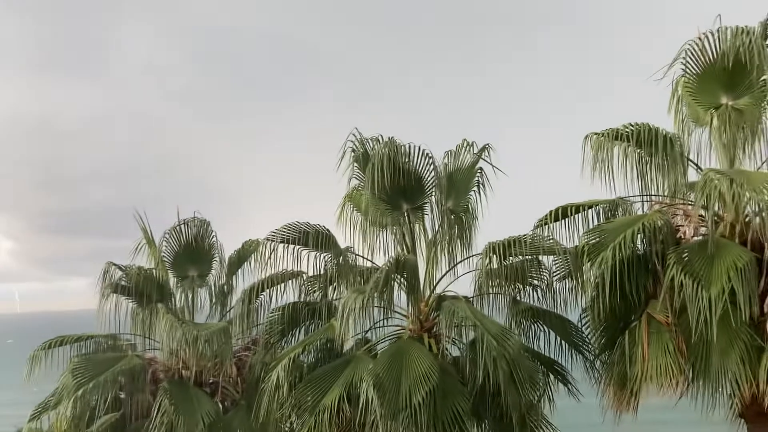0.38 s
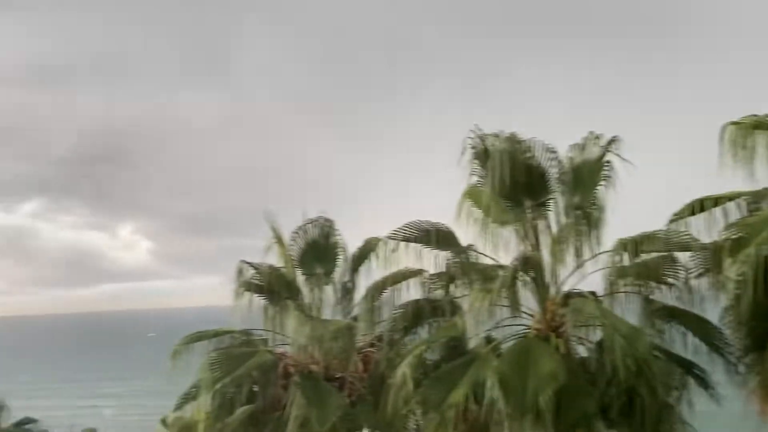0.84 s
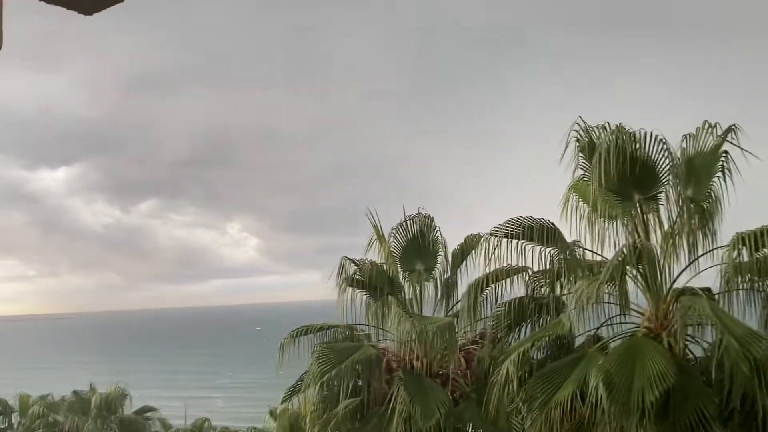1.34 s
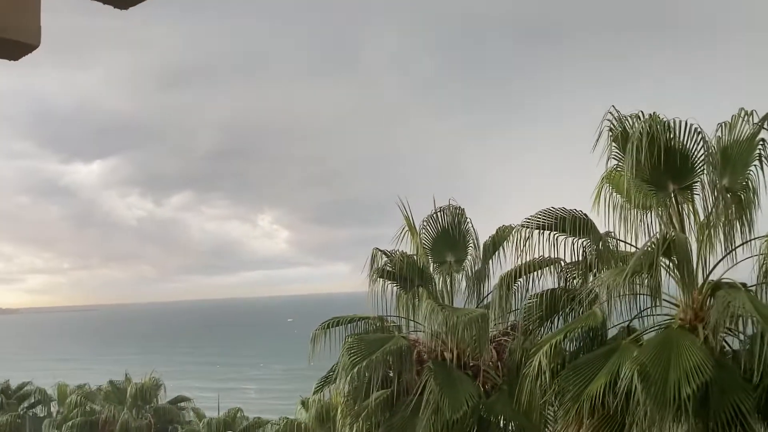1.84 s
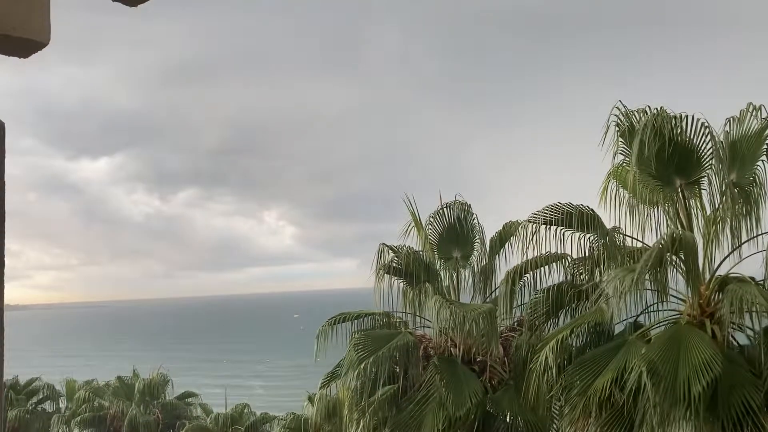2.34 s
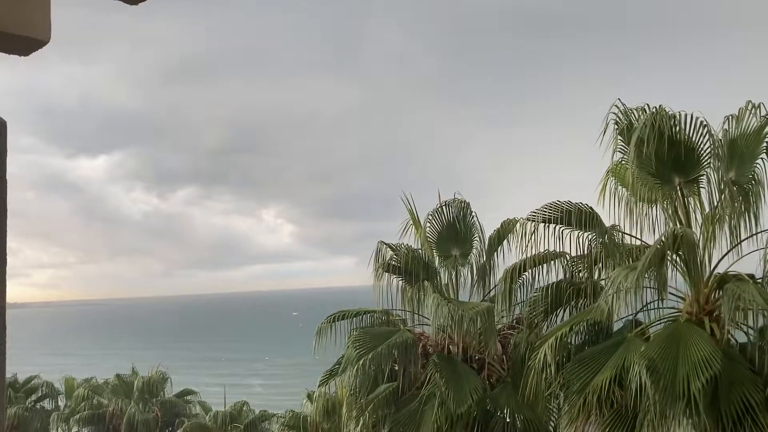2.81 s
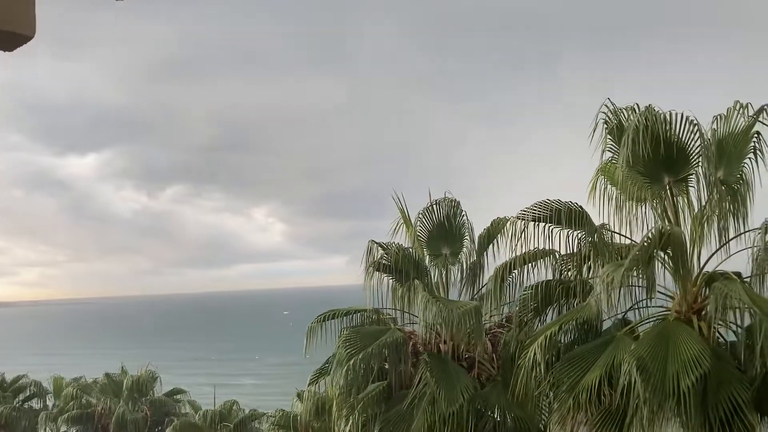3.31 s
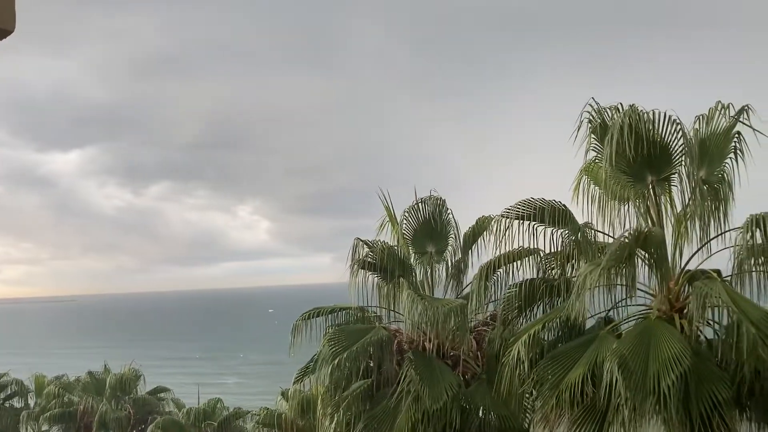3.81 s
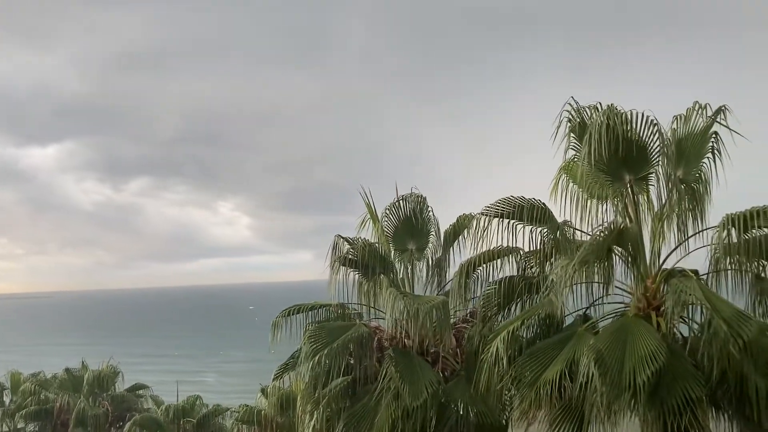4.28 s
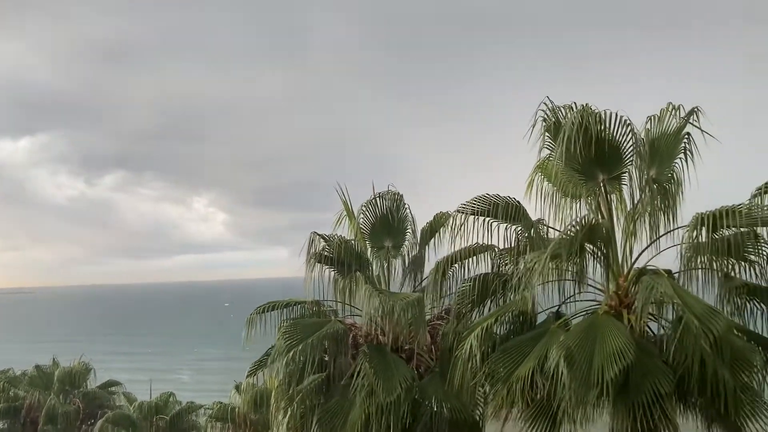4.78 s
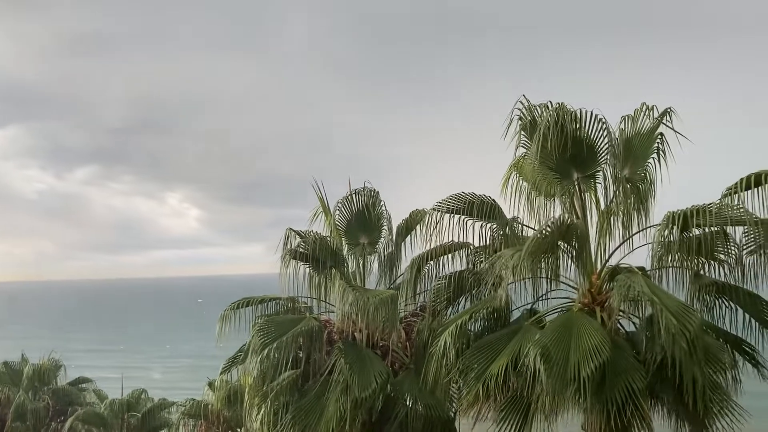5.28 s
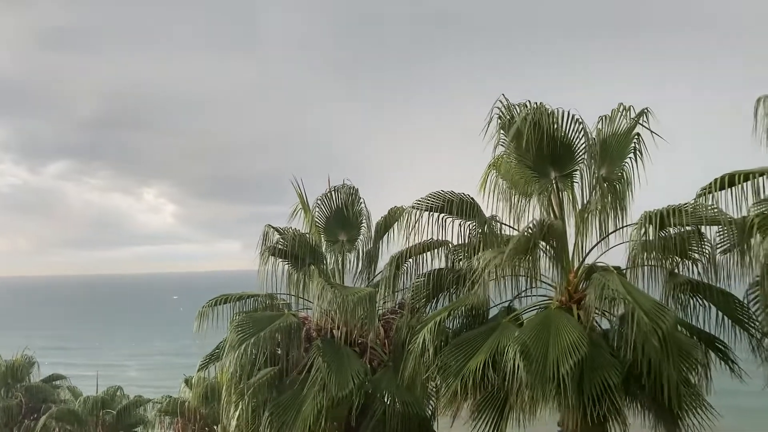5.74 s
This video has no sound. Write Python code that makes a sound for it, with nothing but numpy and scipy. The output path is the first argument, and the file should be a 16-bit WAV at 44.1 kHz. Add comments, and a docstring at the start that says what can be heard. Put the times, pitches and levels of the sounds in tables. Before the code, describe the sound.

From the first instant a loud, deep peal of thunder is already rolling, strongest in the first 0.3 seconds, with heavy low thuds and a brighter growl. It dips, then booms again at about 0.7 seconds and tumbles on around 1.0 and 1.35. By 2.4 seconds it has sunk to a distant murmur. A softer roll rises near 2.9 and grows rougher and brighter around 3.3 to 3.4, then eases. A deeper swell with low thumps comes at about 4.8 to 5.0, followed by short grumbles near 5.5 and 5.8, fading at the end. Underneath, rain stays steady: a soft, grainy rush on palm leaves with tiny ringing plinks and faint airy spray. Near drops tick sharply now and then, notably at 0.9, 2.2 and 5.06 seconds, with the loudest splashy tap at 3.86. The setting is an open balcony, heard in stereo through a small device.

```python
"""A loud peal of thunder rolls over steady rain on palm leaves, heard from a balcony; it dies away, a softer one follows.
Thunder is four bands of noise under a moving level, joined by single low pulses for the strongest shocks.
Rain is dense coloured impulses and noise with short ringing plinks; a few near drops tick as bursts of noise.
Two microphone ports a few centimetres apart hear the treble from one side: likeness, phase and level vary with pitch."""
import sys
import numpy as np
from scipy import signal
from scipy.fft import rfft, irfft, next_fast_len
from scipy.io import wavfile
from scipy.ndimage import uniform_filter1d, map_coordinates

SR = 44100
rng = np.random.default_rng(int(sys.argv[2]) if len(sys.argv) > 2 else 0)


def put_to_file(sound):
    """Save the sound as 16-bit audio at rate SR, in the file named by the first command-line argument."""
    columns = np.atleast_2d(sound).T  # one column per channel
    safe = np.clip(columns, -1, 1)
    whole_steps = np.round(safe * 32767)
    wavfile.write(sys.argv[1], SR, whole_steps.astype(np.int16))


def ratio_of_db(decibels):
    """Turn decibels (scalar or array-like) into linear amplitude factors; 0 dB maps to 1."""
    return 10 ** (np.asarray(decibels, float) / 20)


N = 259308  # length [samples]


def unit(x):
    """Normalization: a signal scaled to rms 1."""
    return x / np.sqrt(np.mean(x ** 2) + 1e-20)


def along(points, hz):
    """Logarithmic pitch: (frequency [Hz], value) points interpolated on a log axis."""
    f, v = np.transpose(points)
    return np.interp(np.log(hz + 1), np.log(f + 1), v)


def curves(rows):
    """Linear interpolation: one value per sample for each column after the time."""
    s, *columns = np.transpose(rows)
    return [np.interp(np.arange(N) / SR, s, column) for column in columns]


def filtered(x, response):
    """Linear filtering: the spectrum of x times a complex response of frequency."""
    m = next_fast_len(N + SR // 2)
    return irfft(rfft(x, m) * response(np.fft.rfftfreq(m, 1 / SR)), m)[..., :N]


def patter(spectrum, per_second, spread_db, wash):
    """Shot noise: two unrelated streams of unequal impulses and a share (wash) of smooth noise, coloured, rms 1."""
    struck = rng.random((2, N)) < per_second / SR
    sizes = ratio_of_db(spread_db * np.minimum(rng.exponential(size=(2, N)), 3.0))
    kicks = struck * rng.choice([-1, 1], size=(2, N)) * sizes
    # shares of power, so square roots of amplitude
    mixed = np.sqrt(1 - wash) * unit(kicks) + np.sqrt(wash) * rng.standard_normal((2, N))
    return unit(filtered(mixed, lambda hz: ratio_of_db(along(spectrum, hz))))


def patches(x, depth_db):
    """Random modulation: soft patches of gain over time and frequency, the same for both streams."""
    bins = signal.stft(x, nperseg=512)[2]
    field = rng.standard_normal(bins.shape[1:])
    field = uniform_filter1d(field, size=6, axis=0)  # across frequency
    field = uniform_filter1d(field, size=10, axis=1)  # across time
    patched = signal.istft(bins * ratio_of_db(depth_db * unit(field)), nperseg=512)[1]
    return unit(patched[:, :N])


def plinks(spectrum, cycles, spread_db, count):
    """Damped resonance: drops that ring for some cycles, each at its own pitch."""
    draw, t = rng.random((count, 4)), np.arange(700) / SR
    hz = 600 * 6.5 ** draw[:, :1]
    size = ratio_of_db(along(spectrum, hz) - spread_db * np.log(draw[:, 1:2] * 0.59 + 0.076))
    envelope = hz * t * np.exp(-hz * t * 3 / cycles) * (1 - t / t[-1])
    rings = size * hz * np.sin(2 * np.pi * hz * t) * envelope
    # both streams lie end to end; half of the drops start in the second
    start = (draw[:, 2:3] * N).astype(int) + (N + len(t)) * (draw[:, 3:] < .5)
    places = start + np.arange(len(t))
    summed = np.bincount(places.ravel(), rings.ravel(), 2 * (N + len(t)))
    return unit(summed.reshape(2, -1)[:, :N])


# strength of the rain: (time [s], strength [dB])
RAIN_STRENGTH = [(0.0, -45), (0.72, -43), (1.57, -44.5), (5.36, -45), (5.58, -45), (5.88, -45.5)]
# colour of the rush on the leaves: (frequency [Hz], relative density [dB per Hz])
LEAF_COLOUR = [(100, -120), (300, -13), (550, -9), (700, -2), (1000, -3.5), (1400, -7.5), (2300, -11),
               (2900, -15.5), (4200, -17.5), (5600, -21.5), (6500, -29), (8000, -27), (12000, -120)]
# colour of the spray above it: (frequency [Hz], relative density [dB per Hz])
SPRAY_COLOUR = [(2000, -120), (4500, -32), (6000, -0.5), (7000, -0.5), (9000, -2.5), (11000, -2),
                (13000, -9), (14500, -9.5), (16500, -12)]


def rain():
    """Superposition: far drops fuse to a rush on the leaves; nearer ones plink in it, a grainier spray lies above."""
    rain_db, = curves(RAIN_STRENGTH)
    leaves = patches(patter(LEAF_COLOUR, per_second=3000, spread_db=-0.5, wash=0.86), depth_db=1.54)
    leaves += ratio_of_db(-10.0) * plinks(LEAF_COLOUR, cycles=12.6, spread_db=4.5, count=5000)
    spray = patches(patter(SPRAY_COLOUR, per_second=200, spread_db=4.0, wash=0.96), depth_db=1.83)
    return ratio_of_db(rain_db) * (ratio_of_db(4.5) * leaves + ratio_of_db(-9) * spray)


# near drops: (time [s], peak in the first stream [dB], time to decay by 26 dB [s], lowest pitch [Hz])
NEAR_DROPS = [(.6429, -38, .012, 6000), (.9035, -29, .005, 8000), (.9453, -36, .05, 7500),
              (1.6994, -38, .02, 7500), (2.2044, -33, .02, 7500), (2.5142, -36, .012, 7000),
              (2.9302, -40, .012, 6000), (3.4416, -36, .012, 5500), (3.858, -24, .01, 2200),
              (3.862, -32, .015, 3000), (3.867, -30, .025, 1900), (4.136, -36, .025, 7000),
              (4.3294, -35, .012, 6000), (4.5176, -36, .035, 8500), (5.0574, -31, .01, 6000),
              (5.4799, -39, .012, 6000), (5.5149, -39, .012, 6000), (5.7594, -38, .035, 7500)]


def drops():
    """Impact noise: a near drop is a sharp tick and a short splash, strongest just over its lowest pitch."""
    out, t = np.zeros((2, N + SR)), np.arange(SR // 8) / SR
    # the second stream adds at the left port and subtracts at the right
    shares = np.array([[1], [0.7]])
    for s, db, length, low_hz in NEAR_DROPS:
        attack = 1 - np.exp(-t / .0004)
        splash = rng.standard_normal(len(t)) * np.exp(-t / length * 3) * attack
        highpass = signal.butter(2, low_hz, "highpass", fs=SR, output="sos")
        lowpass = signal.butter(1, min(1.6 * low_hz, 14000), fs=SR, output="sos")
        splash = signal.sosfilt(np.vstack([highpass, lowpass]), splash)
        out[:, round(s * SR):][:, :len(t)] += ratio_of_db(db) * shares * splash / np.abs(splash).max()
    return out[:, :N]


def evened(x, seconds, share):
    """Diffusion: takes a share of the chance swells out of a stream, as many overlapping echoes do."""
    power = np.abs(uniform_filter1d(x ** 2, int(seconds * SR) + 1, axis=1))
    swell = np.sqrt(power + 1e-3)
    return unit(x / swell ** share)


def wobble(rate):
    """Random fluctuation: a smooth curve of rms 1 through chance knots, rate knots a second."""
    return unit(map_coordinates(rng.standard_normal(200), [np.arange(N) * rate / SR]))


# the roll: (time [s], strength [dB], bright share [dB]); high while near kinks of the bolt sound, low for far ones
ROLL_COURSE = [(0.0, -20, -6), (0.11, -18, -8.5), (0.2, -22, -1.5), (0.23, -18.5, -7.5), (0.36, -31, -7.5),
               (0.41, -25.5, -10.5), (0.46, -31.5, -6), (0.64, -29, -5.5), (0.67, -22.5, -6.5),
               (0.72, -26.5, -10), (0.91, -28.5, -4), (1.0, -26, -10.5), (1.08, -26.5, -3.5),
               (1.18, -33, -6), (1.36, -28, -3), (1.39, -30, -4), (1.7, -33.5, -3.5), (1.93, -29.5, -6),
               (2.39, -37, -3), (2.93, -34.5, -5), (2.95, -31.5, -4), (3.19, -33, -6.5), (3.32, -30, -0.5),
               (3.44, -29, -2.5), (4.19, -32.5, -6.5), (4.65, -30.5, -5), (4.88, -27, -10), (4.9, -33, -6),
               (4.99, -28.5, -8), (5.24, -37, -5), (5.45, -32, -6), (5.5, -35.5, -5.5), (5.53, -29.5, -8.5),
               (5.65, -36.5, -6), (5.78, -30, -7.5), (5.88, -38, -1.5)]
# colours of the four parts of the roll, each: (frequency [Hz], relative density [dB per Hz])
DEEP_COLOUR = [(18, -35), (28, -11), (45, 0), (60, -2.5), (75, -3), (120, -67), (400, -130)]
BODY_COLOUR = [(45, -45), (62, -11), (74, -10), (84, 3.5), (96, -1), (112, -5), (128, -6), (145, -1),
               (175, -14.5), (200, -16.5), (350, -52), (1000, -130)]
BRIGHT_COLOUR = [(120, -39), (165, -4.5), (190, 3.5), (230, -1), (270, -2.5), (320, -9), (500, -44),
                 (1500, -130)]
RATTLE_COLOUR = [(100, -120), (230, -52), (300, -5), (360, -2.5), (450, -5), (600, -7.5), (800, -26),
                 (1500, -55), (4000, -130)]
# single strong shocks: (time [s], peak in the first stream [dB], pitch [Hz])
SHOCKS = [(0.028, -29, 108), (0.104, -34, 101), (0.132, -19.5, 141), (0.211, -22, 110), (0.663, -19.5, 97),
          (1.341, -20, 88), (2.085, -30.5, 230), (2.935, -29, 146), (3.208, -26.5, 99), (3.31, -23, 227),
          (3.344, -22.5, 148), (3.911, -34, 94), (4.365, -33, 148), (4.793, -21, 90), (4.853, -20, 83),
          (5.447, -33, 91), (5.524, -27, 149)]


def thunder():
    """Shock propagation: each kink of the bolt sends a shock; far ones arrive deep, near ones bright, echoes blur all."""
    strength_db, near_db = curves(ROLL_COURSE)
    mean_db = strength_db.mean()

    def gain(over_db, grows, nears, flicker_db, rate):
        """Level law: grows and nears are dB per dB of strength and of bright share; rate in knots a second."""
        level_db = mean_db + over_db + grows * (strength_db - mean_db)
        level_db = level_db + nears * (near_db - near_db.mean())
        return ratio_of_db(level_db + flicker_db * wobble(rate))

    body = evened(patter(BODY_COLOUR, per_second=320, spread_db=1.0, wash=0.8), seconds=0.042, share=0.51)
    deep = evened(patter(DEEP_COLOUR, per_second=200, spread_db=14.0, wash=0.73), seconds=0.089, share=1.0)
    bright = evened(patter(BRIGHT_COLOUR, per_second=300, spread_db=2.5, wash=0.76), seconds=0.025, share=0.62)
    rattle = evened(patter(RATTLE_COLOUR, per_second=300, spread_db=4.0, wash=0.88), seconds=0.19, share=0.13)
    roll = body * gain(over_db=-3, grows=1.04, nears=-0.14, flicker_db=1.1, rate=14)
    roll += deep * gain(over_db=-10, grows=0.98, nears=-0.7, flicker_db=2, rate=8.5)
    roll += bright * gain(over_db=-5.5, grows=1.09, nears=1.12, flicker_db=2.5, rate=15)
    roll += rattle * gain(over_db=-11, grows=0.45, nears=0.94, flicker_db=1.6, rate=11.5)
    for s, db, hz in SHOCKS:
        cycles = np.arange(SR // 20) / SR * hz
        push = np.sin(2 * np.pi * cycles) * cycles * np.exp(1 - cycles / 1.1)  # about two swings of pressure
        roll[0, round(s * SR):][:len(push)] += ratio_of_db(db) * push / np.abs(push).max()
    return roll


# likeness of the two ports: (frequency [Hz], likeness [0-1])
LIKENESS = [(30, 0.92), (60, 0.98), (200, 0.91), (350, 0.76), (500, 0.4), (750, 0.18), (1500, 0.24),
            (2500, 0.14), (4800, 0), (5600, 0.56), (6200, 0.2), (6800, 1), (16000, 0.98)]
# phase by which the right port leads: (frequency [Hz], lead [rad])
RIGHT_LEAD = [(0, 0), (400, 0.1), (1400, 2.3), (2000, 2.3), (2700, -2.4), (3200, -2.4), (3800, .1),
              (5100, 3.1), (7150, 6.28), (11350, 12.57), (15600, 18.85)]
# level difference of the ports: (frequency [Hz], left minus right [dB])
LEFT_TILT = [(60, -0.9), (300, 1), (1000, 0.2), (2200, .6), (3400, 2.5), (5500, 0.5), (8000, -0.3)]


def two_ports(streams):
    """Spatial coherence: a shared stream and an unrelated one reach two ports with unequal phase and level."""
    def weights(hz):
        angle = np.arccos(np.clip(along(LIKENESS, hz), 0, 1)) / 2
        return np.array([np.cos(angle), np.sin(angle)])

    def port(hz):
        half = np.array([[-.5], [.5]])  # left, right
        phase = np.exp(1j * half * np.interp(hz, *np.transpose(RIGHT_LEAD)))
        return phase * ratio_of_db(-half * along(LEFT_TILT, hz))

    shared, apart = filtered(streams, weights)
    return filtered(np.array([shared + apart, shared - apart]), port)


def scene():
    """Superposition: rain, near drops and thunder add, then reach the two ports."""
    return two_ports(thunder() + rain() + drops())


def low_pass(x):
    """Removes everything above the highest recorded frequency."""
    return signal.sosfilt(signal.butter(12, 16970, fs=SR, output="sos"), x)


def record(dry):
    """Band limiting: nothing passes from 15780 Hz up."""
    mix = filtered(dry, lambda hz: hz < 15780)
    return low_pass(mix)


dry = scene()
out = record(dry)
put_to_file(out)
```